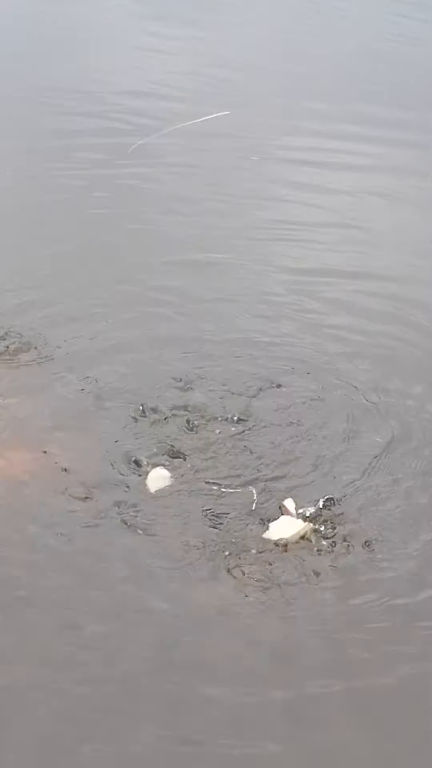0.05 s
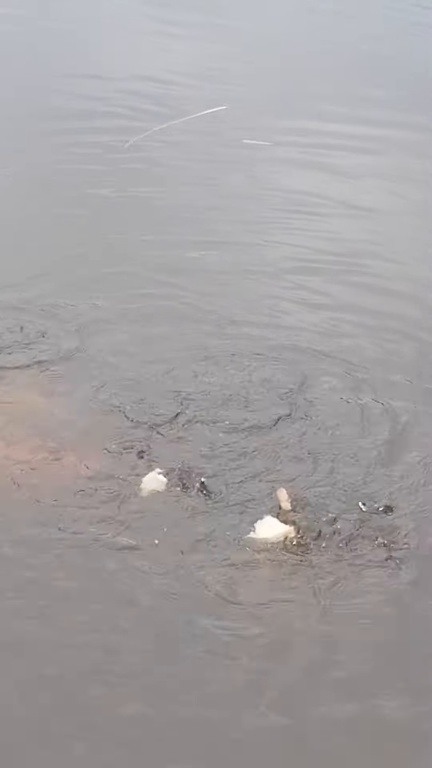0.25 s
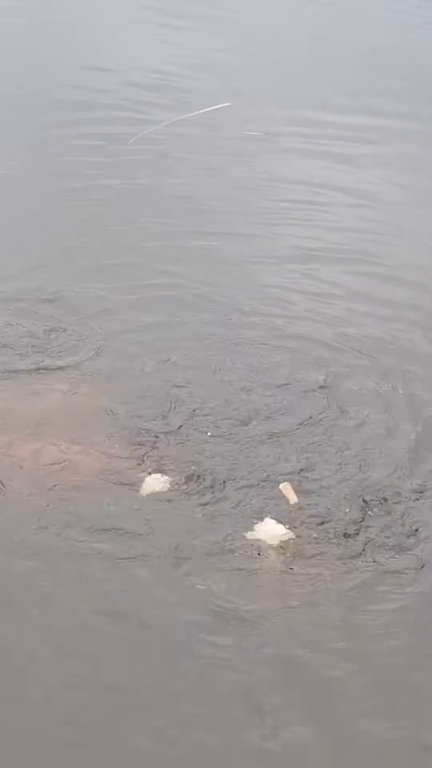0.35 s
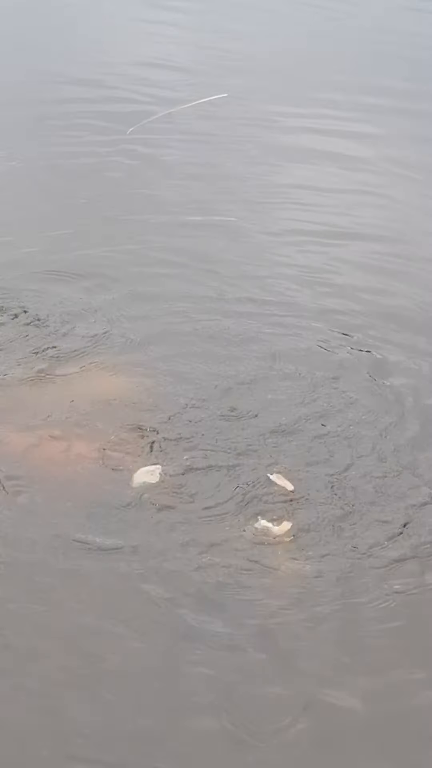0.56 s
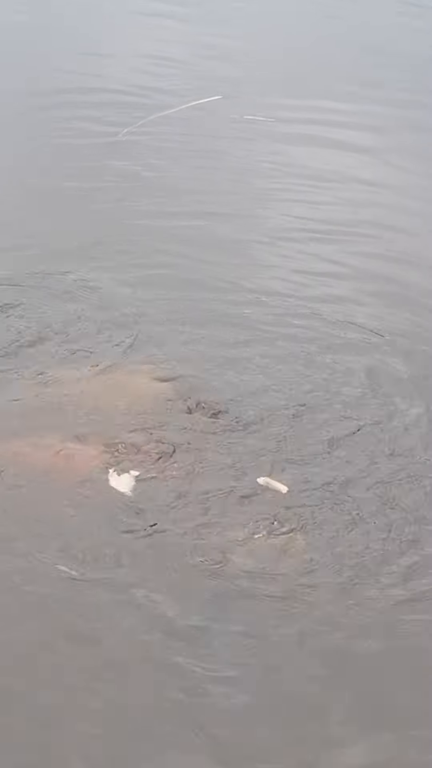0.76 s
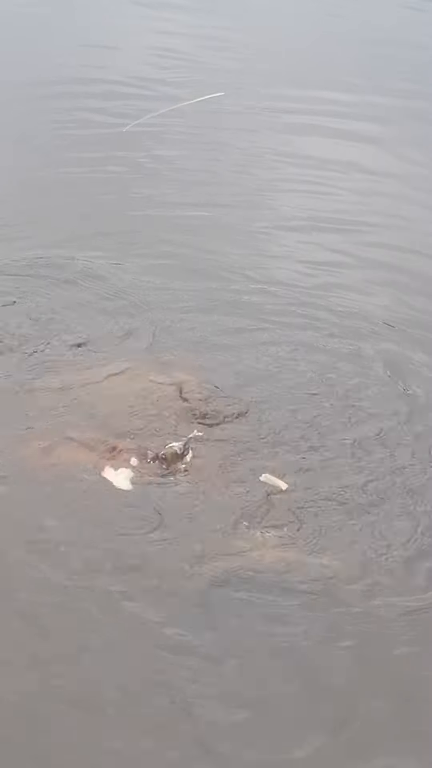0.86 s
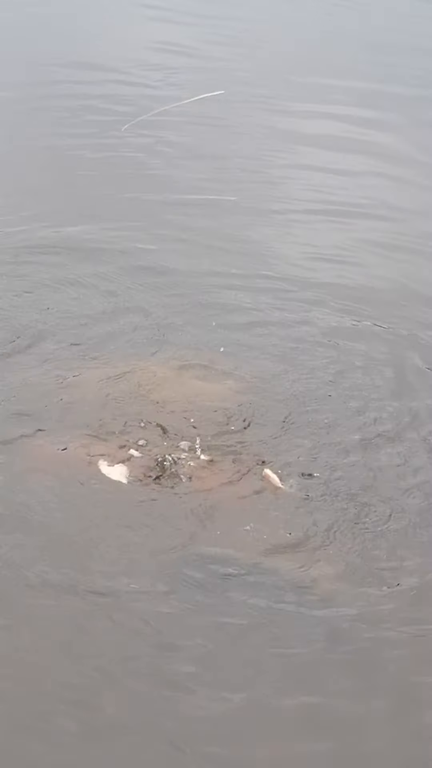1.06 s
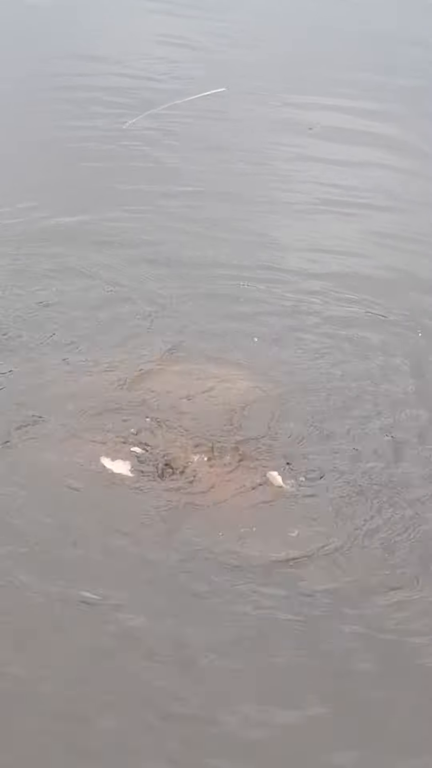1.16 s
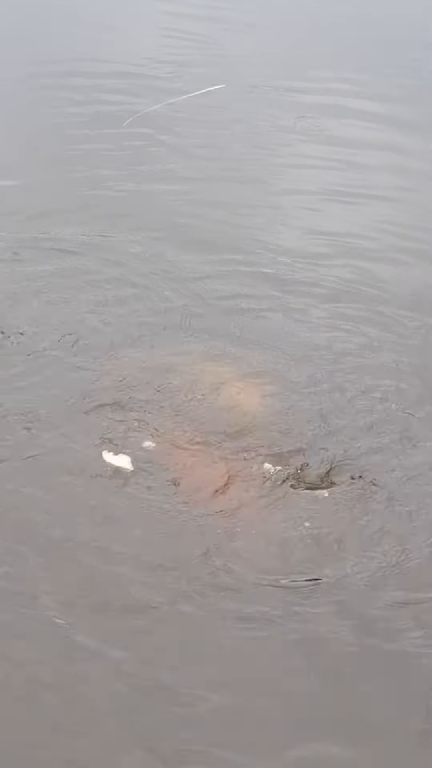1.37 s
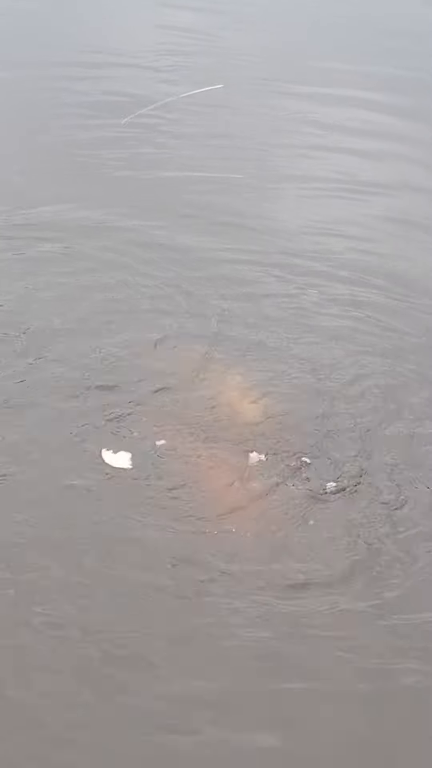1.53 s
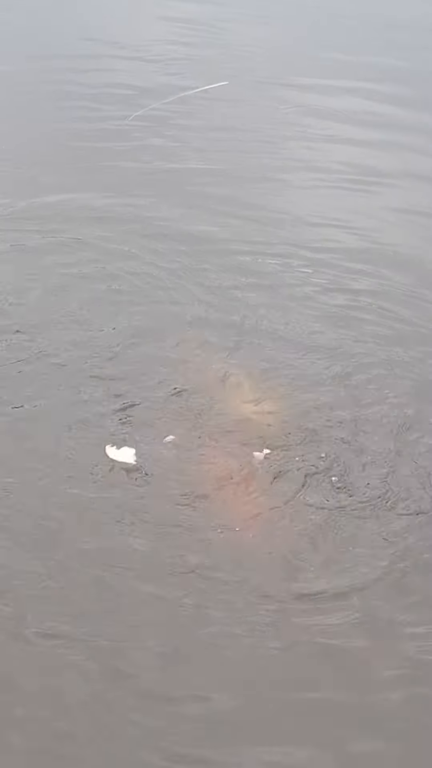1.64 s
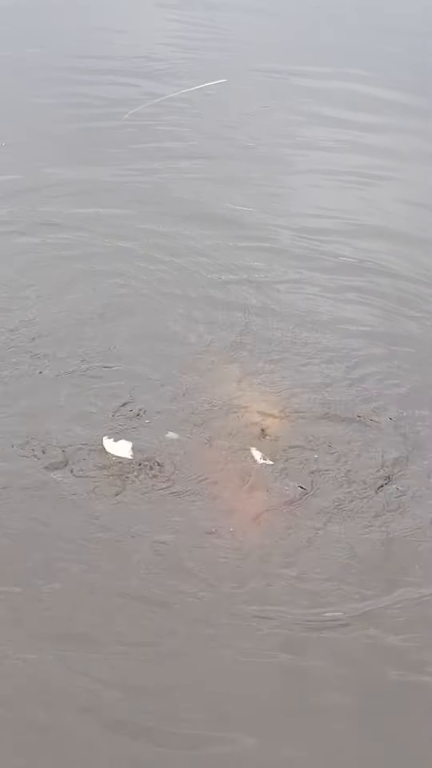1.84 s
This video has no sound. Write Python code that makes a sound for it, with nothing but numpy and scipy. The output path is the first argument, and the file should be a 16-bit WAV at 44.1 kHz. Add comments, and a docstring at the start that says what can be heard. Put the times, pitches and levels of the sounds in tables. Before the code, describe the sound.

Fish take bread at a pond's surface with small splashes, a deep gulp and wet smacks.

```python
"""Soft outdoor air over a quiet pond, with a low drone like a far engine that picks up speed.
A few metres from a close pair of microphones, fish take floating bread at the surface.
Bubbles plip and little splashes fizz; one fish heaves the water over with a deep gulp of
closing air pockets, then wet mouths smack. Very faint chirps come from far off,
and the banks return a light echo."""
import sys
import numpy as np
from scipy import signal
from scipy.fft import rfft, irfft
from scipy.io import wavfile

SR = 44100
rng = np.random.default_rng(int(sys.argv[2]) if len(sys.argv) > 2 else 0)


def digitize_waveform(pressure):
    """Quantize a signal to 16-bit integers and store it at the path in sys.argv[1].

    Rows of a 2-D input are taken as channels; values are limited to [-1, 1].
    """
    field = np.atleast_2d(pressure).T
    bounded = np.clip(field, -1, 1)
    quanta = np.round(bounded * 32767).astype(np.int16)
    wavfile.write(sys.argv[1], SR, quanta)


N = 83790
TIME = np.arange(N) / SR


def amp(db):
    """Decibels to gain."""
    return 10 ** (np.asarray(db) / 20)


def unit(x):
    """Scales to rms 1."""
    return x / np.sqrt(np.mean(x ** 2) + 1e-20)


def read(points, hz):
    """Reads a table on a log-frequency axis."""
    f, value = np.transpose(points)
    return np.interp(np.log(hz + 1), np.log(f + 1), value)


def pan(db):
    """Left and right gains for a level difference; positive is to the left."""
    return amp(np.array([[db], [-db]]) / 2)


def add(mix, start_s, sound):
    """Mixes a sound in at its start time."""
    part = mix[:, max(round(start_s * SR), 0):][:, :sound.shape[1]]
    part += sound[:, :part.shape[1]]


def swell(t, rise, decay):
    """Smooth rise, then exponential decay."""
    return np.sin(np.pi / 2 * np.clip(t / rise, 0, 1)) ** 2 * np.exp(-np.maximum(t - rise, 0) / decay)


def colour(x, gain):
    """Filters by a gain that is a function of frequency."""
    return irfft(rfft(x) * gain(np.fft.rfftfreq(x.shape[-1], 1 / SR)), x.shape[-1])


def pair(z, likeness):
    """Two independent signals become a partly alike stereo pair."""
    likeness = np.clip(likeness, -1, 1)
    return np.array([z[0], likeness * z[0] + np.sqrt(1 - likeness ** 2) * z[1]])


def wide_noise(spectrum):
    """Noise as two close microphones hear it: alike in the bass, unrelated in the treble."""
    # likeness of the two microphones: frequency_hz, correlation
    likeness = [(30, 0.74), (350, 0.68), (700, 0.41), (1500, 0.25), (3000, -0.088), (12000, 0.045)]
    # lean to one side: frequency_hz, left_over_right_db
    balance = [(50, 6.5), (400, 2), (1000, -2.5), (1900, -2), (3500, 3.5), (6000, 3.5), (10000, -1)]
    hz = np.fft.rfftfreq(N, 1 / SR)
    noise = pair(rfft(rng.standard_normal((2, N))), read(likeness, hz))
    side_db = np.outer([1, -1], read(balance, hz)) / 2
    return unit(irfft(noise * amp(read(spectrum, hz) + side_db), N))


def die_away(x, t60):
    """Lets each band decay at its own speed."""
    hz, t, bands = signal.stft(x, SR, nperseg=512)
    fade = amp(-60 * t / read(t60, hz)[:, None])
    return signal.istft(bands * fade, SR, nperseg=512)[1][:, :x.shape[1]]


def air():
    """A soft outdoor wash all around the microphones eases slightly."""
    # spectrum of the air: frequency_hz, relative_db
    spectrum = [(20, -7), (45, -7.5), (70, -12), (110, -13), (200, -18.5), (330, -22), (500, -24.5),
                (900, -22), (1400, -26.5), (2200, -28.5), (3400, -31), (4500, -34.5), (7000, -39),
                (9500, -46.5), (12000, -52), (15000, -52.5)]
    # loudness of the air: time_s, level_db
    levels = [(0, -61.5), (.15, -63.5), (.55, -63.5), (.8, -64), (1.15, -63.5), (1.5, -64), (1.9, -64.5)]
    return amp(np.interp(TIME, *np.transpose(levels))) * wide_noise(spectrum)


def drone():
    """Three low harmonics follow one speed, like an engine far away."""
    # course of the drone: time_s, pitch_hz, level_db
    course = [(0, 36.6, -75), (0.499, 39.08, -65.5), (.72, 40.14, -63.5), (1.0, 39.67, -69.5),
              (1.181, 39.17, -70), (1.35, 40.74, -59.5), (1.49, 38.97, -80.5), (1.638, 43.95, -61.5),
              (1.718, 49.5, -59), (1.798, 53.7, -66), (1.9, 56.6, -60.5)]
    # first three multiples of the pitch: relative_db
    harmonics = [3.5, -9, -18]
    times, hz, db = np.transpose(course)
    phase = 2 * np.pi * np.cumsum(np.interp(TIME, times, hz)) / SR
    tone = sum(amp(harmonic_db) * np.sin(k * phase + 2 * np.pi * rng.random())
               for k, harmonic_db in enumerate(harmonics, 1))
    return amp(np.interp(TIME, times, db)) * pan(0.83) * unit(tone)


def bubbles(right_lag_s=0.00008):
    """Trapped bubbles ring, sliding in pitch as they surface or open; the left microphone leads."""
    # bubbles: start_s, pitch_hz, peak_db, rise_s, decay_s, glide_octaves_per_s, pan_db
    plips = [ (0.019, 1980, -58.5, 0.001, 0.0045, -9, -12), (.0818, 3300, -53, 0.00037, 0.0019, -5, 1),
             (.0822, 4220, -56.5, 0.00032, 0.0011, 2, 5), (.138, 608, -64, 0.0055, 0.014, 11, 4),
             (0.2044, 1587, -56.5, .002, 0.0034, 9, 0), (.219, 1740, -45, .005, .003, 9.5, -9.5),
             (.2395, 515, -50.5, 0.0044, 0.0064, 2, -5), (.2400, 2050, -44, .002, 0.0014, -9.5, -2),
             (.2405, 372, -39, 0.0049, 0.0031, -1, 4.5), (.2435, 3380, -50, 0.00074, 0.0023, -5, -4),
             (.305, 366, -39.5, 0.0013, 0.0079, -2.5, -1), (0.7989, 1353, -52, .0005, 0.0084, -26.5, 6),
             (0.8515, 2650, -55, 0.0029, .003, -2, 17), (0.861, 1155, -50.5, 0.0013, 0.0021, -29, 10),
             (.9080, 3470, -44, 0.00069, 0.00094, -5, 3), (0.9087, 4200, -48, 0.0015, .0028, -3, 4.5),
             (0.949, 1282, -60.5, 0.0022, 0.0098, 5.5, 21), (0.9618, 1230, -44.5, 0.0021, 0.0016, -14, 8),
             (.965, 760, -54.5, 0.00093, 0.0092, -14.5, 1), (.989, 550, -58.5, 0.0017, .012, 10.5, 14),
             (.9905, 4290, -55.5, 0.0014, 0.0025, -2, 9), (1.022, 536, -60, 0.002, 0.017, 15.5, 10.5),
             (1.0225, 3680, -64, 0.0012, 0.0027, -6, 4), (1.080, 1820, -44, 0.0051, 0.0026, -10, -6),
             (1.2898, 1720, -52.5, 0.0025, 0.00087, 10, -9), (1.2940, 1943, -40, 0.004, 0.0026, 4, -4.5),
             (1.3302, 2560, -58, 0.0022, 0.0033, -7, 2), (1.417, 5250, -61, .002, .002, 7, 6)]
    t, out = TIME[:4096], np.zeros((2, N))
    for start, hz, db, rise, decay, glide, pan_db in plips:
        phase = 2 * np.pi * np.cumsum(hz * 2 ** (glide * t)) / SR
        lag = 2 * np.pi * hz * np.array([[0], [right_lag_s]])
        add(out, start, amp(db) * pan(pan_db) * swell(t, rise, decay) * np.sin(phase - lag))
    return out


def spray(hz, octaves, size, drops_per_s=3500, spread_db=6.5, top_hz=10700):
    """Tiny droplets of uneven strength click in one broad band."""
    def band(f):
        return np.exp(-(np.log2((f + 1) / hz) / octaves / 2) ** 2) / (1 + (f / top_hz) ** 4)

    strength = rng.standard_normal((2, size)) * amp(spread_db * rng.standard_normal((2, size)))
    lands = rng.random((2, size)) < drops_per_s / SR
    return unit(colour(pair(strength * lands, likeness=0.37), band))


def pings(hz, octaves, size, count=12, pings_per_s=320, decay_cycles=7.2):
    """Tiny bubbles left by a splash ring at random moments around one pitch."""
    t, out = TIME[:size], np.zeros((2, size))
    for spread, lag in rng.uniform(-1.003, 1, (count, 2)):
        pitch = hz * 2 ** (octaves * spread)
        phase = 2 * np.pi * pitch * t - np.array([[0], [2 * lag]])
        ping = np.sin(phase) * swell(t, 1 / pitch, decay_cycles / pitch)
        onsets = rng.random((1, size)) < pings_per_s / count / SR
        out += signal.fftconvolve(onsets.astype(float), ping, axes=1)[:, :size]
    return unit(out)


def splashes(ping_db=-1.5, size=8192):
    """Each little splash throws a spray of droplets and leaves tiny bubbles ringing."""
    # splashes: start_s, level_db, rise_s, decay_s, centre_hz, width_octaves, pan_db
    bursts = [ (0.0811, -55.5, 0.00066, 0.0021, 2590, 0.75, 3), (.155, -62, 0.0014, .003, 5050, 0.65, 5),
              (0.161, -63.5, 0.0063, 0.045, 1964, 0.63, 0.5), (.218, -49.5, 0.004, 0.014, 495, 1.04, -3),
              (0.2392, -56.5, 0.0043, 0.0078, 2210, 0.8, 10.5), (0.245, -59, .0004, 0.0011, 5500, 0.57, 2),
              (0.251, -63.5, .002, 0.0038, 7640, 0.18, -2), (.269, -54, 0.0034, 0.017, 858, 0.68, -3),
              (0.7969, -58, 0.001, 0.0037, 1620, 0.81, -3), (.860, -58, 0.00083, 0.0024, 2070, 0.88, 16),
              (.9080, -48, 0.00031, 0.0023, 2960, 0.38, 2), (.940, -60, 0.025, 0.013, 1680, 0.75, -2.5),
              (0.9709, -56.5, 0.00077, 0.0024, 6300, 0.47, 4), (.98, -65, 0.0047, 0.046, 754, 0.72, 5),
              (1.010, -69, 0.0012, 0.0048, 6100, 0.06, 17), (1.023, -59.5, 0.0013, .005, 3400, 0.68, 1),
              (1.264, -76, 0.0034, 0.0046, 10200, .12, -4), (1.288, -55, 0.0053, 0.0072, 1243, 0.58, 3),
              (1.320, -64, 0.013, 0.015, 3250, 0.54, 0.5), (1.329, -76.5, .005, 0.013, 11100, .2, -3),
              (1.6712, -58.5, 0.00092, 0.0023, 652.4, 0.75, -13),
              (1.764, -66, 0.001, 0.0037, 3470, 0.88, 1)]
    out = np.zeros((2, N))
    for start, db, rise, decay, hz, octaves, pan_db in bursts:
        fizz = unit(spray(hz, octaves, size) + amp(ping_db) * pings(hz, octaves, size))
        add(out, start, amp(db) * pan(pan_db) * fizz * swell(TIME[:size], rise, decay))
    return out


def gulp(churn_db=-37, churn_rise_s=0.0071):
    """Large air pockets close and boom one after another while the water churns and settles."""
    # closing air pockets: start_s, pitch_hz, level_db, decay_s
    pockets = [(0.218, 146, -47, 0.026), (0.245, 170.6, -25, 0.0073), (0.2719, 138.8, -26.5, 0.01),
               (0.2987, 108.9, -35, 0.047)]
    # spectrum of the churning water: frequency_hz, relative_db
    spectrum = [(20, -1), (55, -1.5), (110, 0.5), (250, -8.5), (400, -11), (600, -26.5), (900, -27),
                (1400, -34), (4000, -41), (9000, -60), (15000, -63)]
    # settling of the churn: frequency_hz, t60_s
    settling = [(50, 0.71), (150, 0.49), (500, 0.42), (1500, 0.51), (9000, 0.36)]
    out = np.zeros((2, N))
    for start, hz, db, decay in pockets:
        boom = np.sin(2 * np.pi * hz * TIME) * swell(TIME, 0.00075, decay)
        add(out, start, amp(db) * pan(1) * boom)
    churn = die_away(wide_noise(spectrum), settling) * np.minimum(TIME / churn_rise_s, 1)
    add(out, start_s=0.236, sound=amp(churn_db) * churn)
    return out


def chirps(blur_hz=120):
    """Thin, very faint whistles, smeared by distance."""
    # far chirps: start_s, pitch_hz, level_db, length_s, glide_octaves_per_s
    whistles = [(.335, 4610, -75.5, .025, -0.79), (0.448, 3480, -75, 0.036, -0.89),
                (0.647, 3350, -75.5, 0.064, .7), (0.714, 3050, -78, 0.047, -1.7),
                (0.81, 3010, -80, 0.054, -2.8), (0.888, 3350, -77, 0.049, 1.6),
                (1.831, 3730, -81, .04, -0.099)]
    out = np.zeros((2, N))
    for start, hz, db, length, glide in whistles:
        t = np.arange(0, length, 1 / SR)
        blur = colour(rng.standard_normal((2, 4096)), lambda f: np.exp(-(f / blur_hz) ** 2))
        phase = 2 * np.pi * np.cumsum(hz * 2 ** (glide * t)) / SR
        tone = np.sin(phase) * (1 + unit(blur[:, :len(t)]))
        add(out, start, amp(db) * unit(tone) * np.sin(np.pi * t / length))
    return out


def snaps(t, length, rise_s, decay_s, fade_db=-6.5):
    """Envelope of the water film on the lips snapping three times, each weaker."""
    return sum(amp(fade_db * share) * swell(t - share * length, rise_s, decay_s)
               for share in (0, 0.5, 1))


def smacks(size=2048):
    """Each snap of the film on a fish's lips crackles and rings the cavity of its open mouth."""
    # smacks with three mouth resonances each:
    # start_s, length_s, low_hz, low_db, mid_hz, mid_db, high_hz, high_db, crackle_db, pan_db
    mouths = [(0.8532, 0.0041, 1160, -56.5, 1754, -52, 1930, -51, -56.5, -9),
              (1.082, 0.0056, 729, -43, 1089, -45.5, 1366, -47, -44, 4.5),
              (1.2107, 0.00373, 570, -42.5, 723, -48, 1000, -46.5, -50, 8)]
    # spectrum of the crackle: frequency_hz, relative_db
    spectrum = [(300, -36), (1500, 5), (2250, -3), (2630, -6), (3000, -12), (3600, -0.5), (4400, -1),
                (5100, -10), (6000, -1), (6800, -8), (7600, -5), (9000, -11), (10200, -5.5), (11500, -24),
                (13500, -15), (15000, -24)]
    t, out = TIME[:size], np.zeros((2, N))
    for start, length, low_hz, low_db, mid_hz, mid_db, high_hz, high_db, crackle_db, pan_db in mouths:
        cavity = sum(amp(db) * np.sin(2 * np.pi * (hz * t + rng.random()))
                     for hz, db in [(low_hz, low_db), (mid_hz, mid_db), (high_hz, high_db)])
        cavity *= snaps(t, length, rise_s=0.00024, decay_s=0.0014)
        noise = pair(rng.standard_normal((2, size)), likeness=0.074)
        crackle = unit(colour(noise, lambda hz: amp(read(spectrum, hz))))
        crackle *= snaps(t, length, rise_s=0.00013, decay_s=0.0015)
        smack = pan(pan_db) * cavity + amp(crackle_db) * pan(pan_db / 2) * crackle
        low_cut = signal.butter(4, 0.58 * low_hz, "high", fs=SR, output="sos")
        add(out, start, signal.sosfilt(low_cut, smack))
    return out


def banks(x, echo_db=-13, size=24000):
    """The banks of the pond return a faint, diffuse echo."""
    # likeness of the echo at the two microphones: frequency_hz, correlation
    likeness = [(100, 1), (400, 1), (900, 0.93), (2000, 0)]
    # decay of the echo: frequency_hz, t60_s
    t60 = [(200, 0.44), (1500, 0.3), (4000, 0.41), (12000, 0.33)]
    hz = np.fft.rfftfreq(size, 1 / SR)
    noise = pair(rfft(rng.standard_normal((2, size))), read(likeness, hz))
    tail = die_away(irfft(noise, size), t60)
    return amp(echo_db) * signal.fftconvolve(x, tail / np.linalg.norm(tail[0]), axes=1)[:, :N]


def scene():
    """The feeding fish and far chirps, with their echo, over the air and the drone."""
    background = air() + drone()
    events = gulp() + smacks() + bubbles() + splashes() + chirps()
    return background + events + banks(events)


def record(dry):
    """The recorder cuts the treble above 15.3 kHz."""
    low_pass = signal.firwin(511, 15300, window=("kaiser", 9), fs=SR)
    return signal.oaconvolve(dry, low_pass[None], "same")


dry = scene()
out = record(dry)
digitize_waveform(out)
```